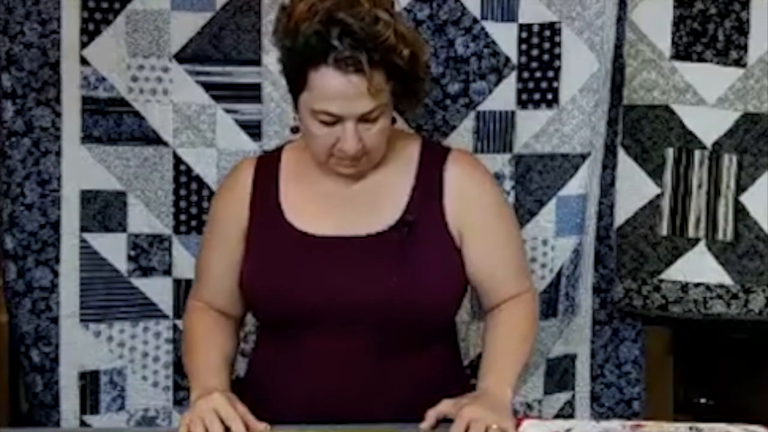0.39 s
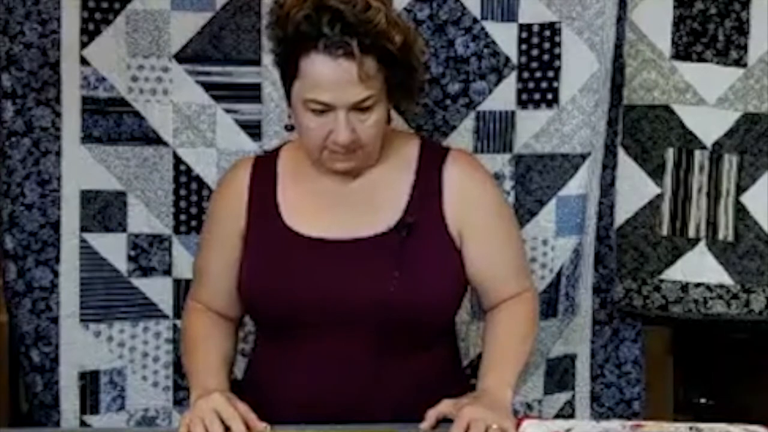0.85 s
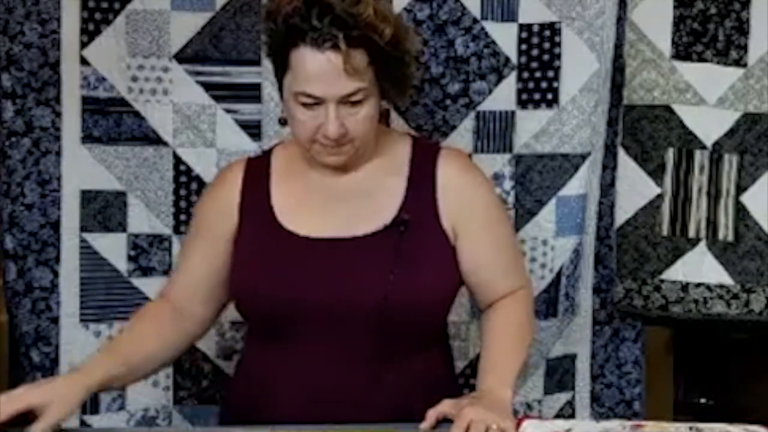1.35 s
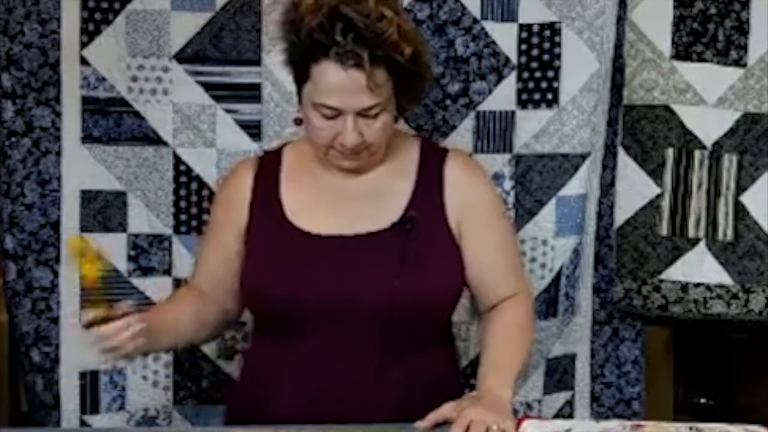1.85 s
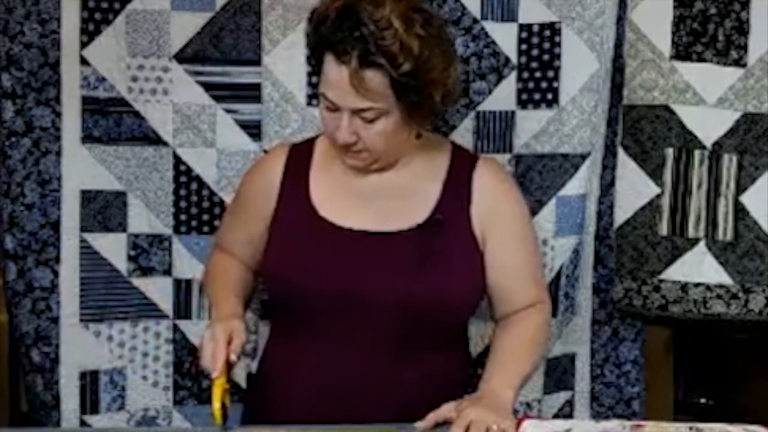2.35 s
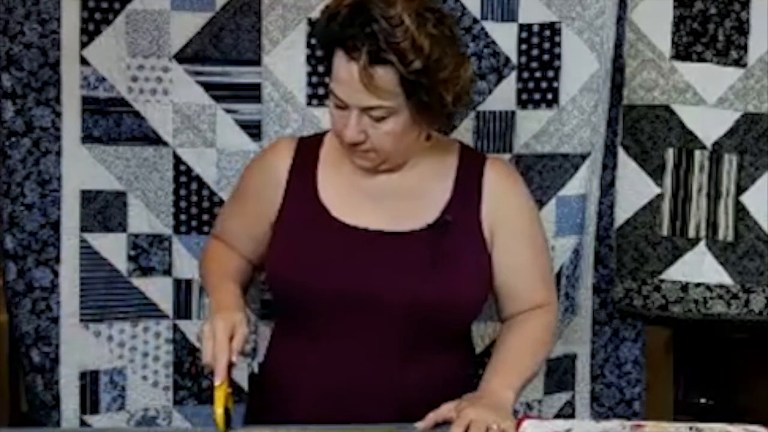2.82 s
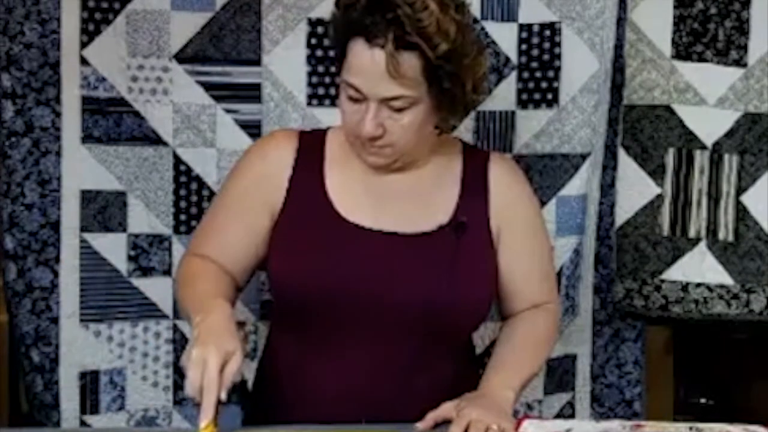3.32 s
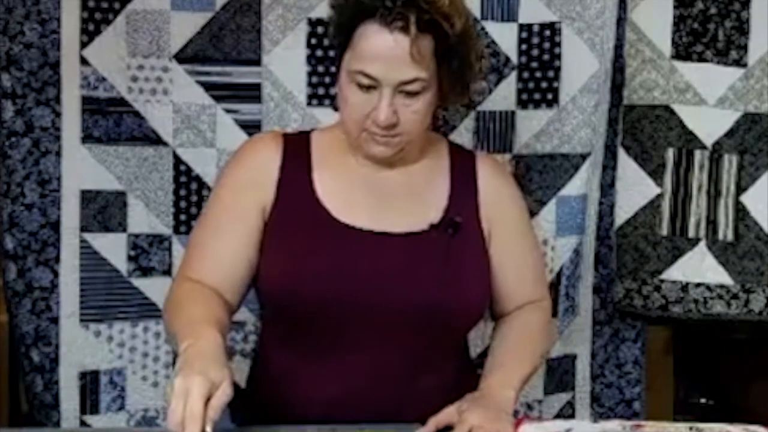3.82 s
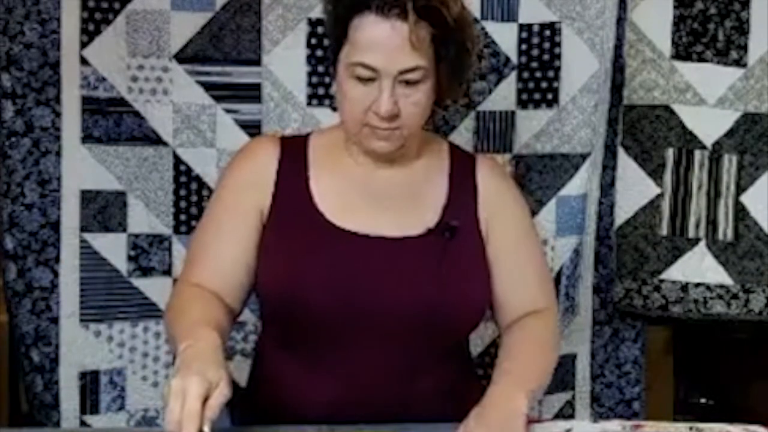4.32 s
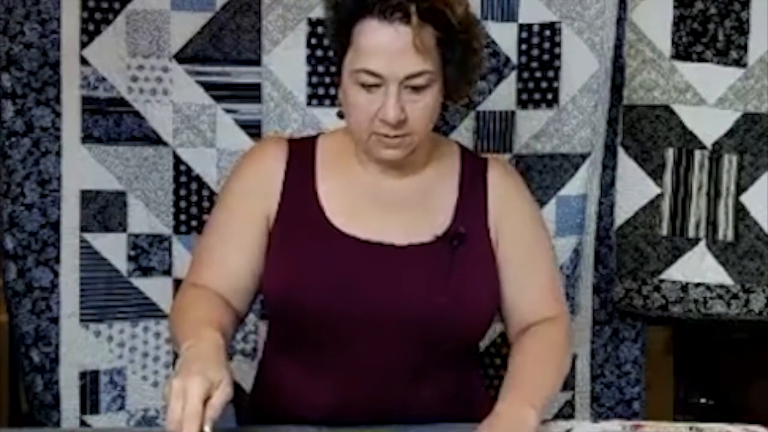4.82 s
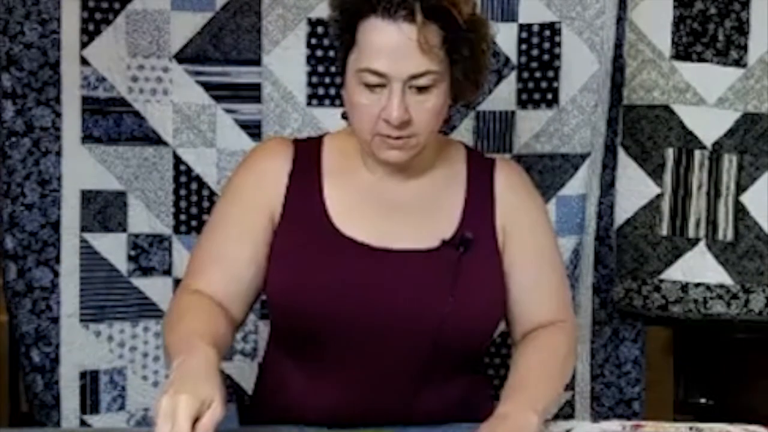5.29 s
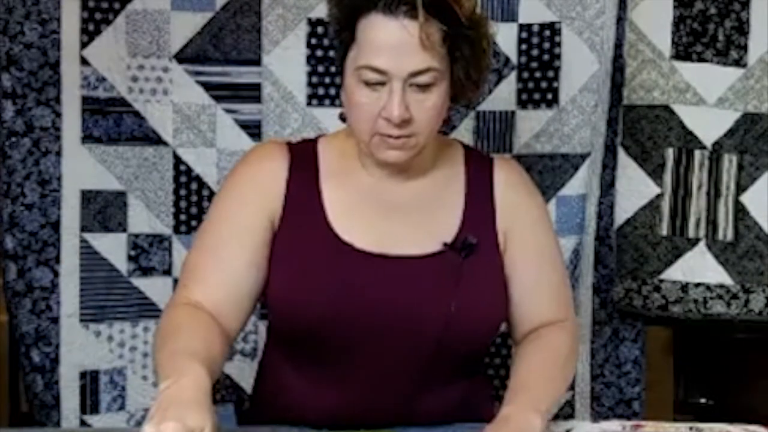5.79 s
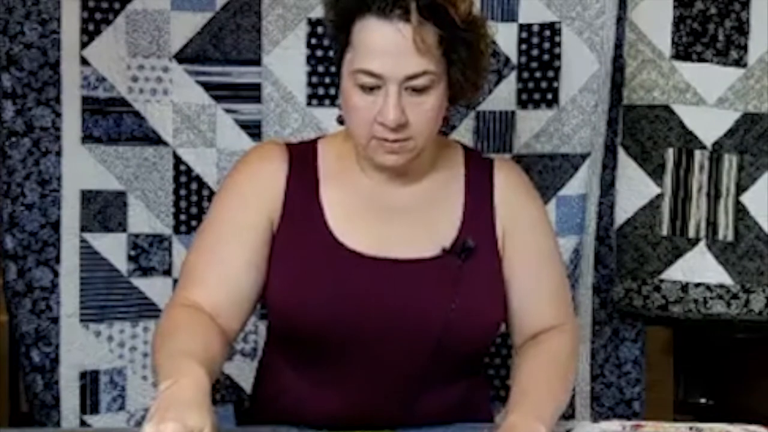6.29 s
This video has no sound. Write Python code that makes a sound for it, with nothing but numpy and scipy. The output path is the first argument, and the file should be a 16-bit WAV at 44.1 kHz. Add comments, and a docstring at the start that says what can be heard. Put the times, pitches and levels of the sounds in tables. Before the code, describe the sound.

A small, quiet room with a soft steady hiss and a faint low table rumble, heard close in mono. The first second is nearly still, with only a tiny rustle and light thumps. At 1.3 s a sharp plastic clack snaps out, followed by small rattles, a louder crack near 1.6 and another at 1.8, with thumps and brushing cloth. Faint ticks and rustles lead to about 2.8. From 2.9 to 3.6 a rotary cutter rolls through cotton: a swelling bright, grainy crackle with a scratchy scrape, slight metallic ring and clicks near 3.4 and 3.5. A lighter, thinner slide back runs to about 4.4, with ticks near 3.75. Soft rustling follows. A second, duller cut rasps from 4.9 to 5.6, with taps at 5.2 and 5.4. A brief gentle slide near 6.0 fades into hiss.

```python
"""A rotary cutter rolls through cotton on a cutting mat: threads snap in a bright crackle of tiny grains,
the blade scrapes the mat, and the same grainy drag rings the blade and ruler. Cloth brushes by in coloured grains.
Before the cut come sharp plastic taps, short bursts of noise that ring the handle; more blows fall among the passes.
The table rumbles on its low modes, and a small room of sparse echoes lies under a quiet hiss."""
import sys
import numpy as np
from scipy import signal
from scipy.io import wavfile
from scipy.ndimage import uniform_filter1d

SR = 44100
rng = np.random.default_rng(int(sys.argv[2]) if len(sys.argv) > 2 else 0)


def wrap_up_sound(samples):
    """Save the sound to the file named by the first command line argument, as 16-bit audio."""
    columns = np.atleast_2d(samples).T
    # keep every value between -1 and 1, then stretch to whole-number steps
    tamed = np.clip(columns, -1, 1)
    steps = np.round(tamed * 32767).astype(np.int16)
    wavfile.write(sys.argv[1], SR, steps)


def boost(x):
    """Linear amplitude factor 10**(x/20) for a level x in decibels (scalar or array-like)."""
    u = np.asarray(x, float) / 20
    return 10 ** u


N = 282899

# Colour of the background hiss. Each row: frequency in Hz, relative level in dB per Hz.
HISS_COLOUR = [(15, -30), (25, -6.5), (71, -3), (152, -7.5), (322, -18.5), (399, -10), (456, -15.5),
               (581, -13.5), (741, -15.5), (1170, -13.5), (1950, -17.5), (6540, -22), (9790, -23),
               (13500, -14.5), (15500, -44)]
HISS_DB = -53.5

# Low modes of the table. Each row: frequency in Hz, width in Hz, relative level in dB.
TABLE_MODES = [(62.7, 11.6, 3.5), (76.5, 8.7, -5.5)]
# Modes of the cutting mat. Each row: frequency in Hz, width in Hz, relative level in dB.
MAT_MODES = [(173, 330, -0.5), (308, 74, 0.5), (377, 79, -2), (514, 134, 1)]
# Weight landing on the table. Each row: start in seconds, table push in dB, mat push in dB, length in seconds.
THUMPS = [(0.39, -51, -67, 0.06), (0.797, -55, -59, 0.054), (1.287, -38.5, -44, 0.066),
          (1.38, -52, -46.5, 0.045), (1.419, -55, -52.5, 0.14), (1.506, -39.5, -51.5, .1),
          (1.717, -61, -57, .06), (2.39, -50, -50, 0.069), (2.77, -46, -54.5, 0.066),
          (2.827, -43, -56, 0.13), (3.026, -52, -53, 0.27), (3.21, -44, -51.5, 0.17),
          (3.356, -46.5, -61, 0.15), (3.456, -48, -57, 0.17), (4.42, -65, -74, 0.047),
          (4.882, -52.5, -61, 0.15), (5.227, -52, -68, 0.11), (5.34, -47, -59, 0.17),
          (5.675, -47, -55, 0.047), (5.935, -52, -68, 0.087)]
THUMP_RISE_S = 0.015
IDLE_TABLE_DB, IDLE_MAT_DB, IDLE_WAVER_DB = -59, -63.5, 1

# Four passes of the cutter: cut, slide back, cut, short slide. Each row of a pass: time in seconds,
# thread crackle in dB, scrape in dB, low mids in dB; the last two before the shares below.
PASSES = [
    [(2.86, -60, -66, -64), (2.916, -45, -54.5, -50), (2.996, -37, -45, -62), (3.1, -31.5, -42, -51.5),
     (3.202, -29.5, -40.5, -44.5), (3.3, -27, -40, -43.5), (3.4, -28, -41, -38.5),
     (3.47, -35.5, -39, -46.5), (3.51, -33.5, -42.5, -42.5), (3.552, -54, -67, -58), (3.6, -41, -60, -60)],
    [(3.6, -44, -57.5, -57), (3.678, -41.5, -54.5, -63), (3.726, -35.5, -50.5, -56.5),
     (3.88, -31.5, -50, -57), (3.928, -29.5, -44.5, -41), (3.97, -33, -51, -57.5), (4.158, -33.5, -52, -65),
     (4.274, -41.5, -61.5, -67), (4.46, -55, -68, -78)],
    [(4.87, -65, -75, -65), (4.944, -50.5, -55.5, -57), (5.01, -42.5, -48.5, -49), (5.15, -40.5, -46, -46),
     (5.21, -39.5, -42.5, -48.5), (5.37, -35.5, -41.5, -40.5), (5.488, -34.5, -39.5, -43.5),
     (5.568, -50, -53.5, -47.5), (5.63, -54, -72, -72)],
    [(5.84, -53, -73, -65), (5.912, -43.5, -55.5, -56.5), (5.978, -40, -48, -51.5),
     (6.014, -42.5, -48.5, -56), (6.06, -48, -63, -62), (6.14, -72, -79, -79)],
]
# How each pass shares out. Each row: mat scrape and blade ring in dB on the scrape,
# then ruler ring, cloth brush and mat thud in dB on the low mids.
PASS_SHARES = [(0.5, -10, -3, -1, -11.5), (-2.5, -14, -9.5, -3, -13), (-4.5, -8, -1.5, -4, -13),
               (-4, -5, -33, 1.5, -17)]
# Hands and cutter brushing over the cloth. Each row: peak time in seconds, crackle in dB, scrape in dB,
# low mids in dB, length in seconds; scrape and low mids before the shares.
RUSTLES = [(0.018, -40, -62, -72, 0.036), (1.1, -48, -71, -68, 0.16), (1.333, -60, -54, -53, 0.14),
           (1.405, -62, -57, -49, .1), (1.499, -42, -49, -40.5, 0.12), (1.568, -40.5, -50, -46.5, 0.072),
           (1.632, -46, -51, -55, .2), (1.847, -47, -50, -61, .15), (2.025, -48, -59, -73, 0.19),
           (2.237, -58, -66, -67, 0.17), (2.74, -55, -63, -62, 0.52), (4.515, -48, -68, -68, 0.21),
           (4.68, -51, -66, -72, .2), (5.692, -46.5, -58.5, -59, 0.38), (6.23, -59, -72, -74, 0.17)]
# How every rustle shares out: the same five values in dB as a row of the pass shares.
RUSTLE_SHARES = (-0.5, -12.5, -14, 1, -14)
RUSTLE_EDGE_DB, RUSTLE_RISE = -12.5, 0.32  # either end against the peak; share of the length spent rising

# Colour of the parting threads. Each row: frequency in Hz, relative level in dB per Hz.
THREAD_COLOUR = [(880, -38), (1500, -18), (1770, -27.5), (3470, -18.5), (3870, -19), (7960, -17),
                 (11200, -5), (13200, 1.5), (14400, 0), (14900, -24), (15500, -32)]
# Colour of the blade scraping the mat. Each row: frequency in Hz, relative level in dB per Hz.
SCRAPE_COLOUR = [(320, -39), (550, 3.5), (801, -4), (1560, -3), (1940, -9.5), (3310, 2), (3930, -1.5),
                 (6230, 0), (10000, -1), (13000, -53), (22000, -120)]
# Colour of the brushing cloth. Each row: frequency in Hz, relative level in dB per Hz.
BRUSH_COLOUR = [(300, -36), (700, -4.5), (1300, 2), (1900, -4), (2400, -7.5), (3500, -9), (6000, -23)]
# Modes of the singing blade. Each row: frequency in Hz, width in Hz, level in dB before the song's centre tilts it.
BLADE_MODES = [(2530, 250, -2), (2800, 82, -6), (3100, 18, -8.5), (3400, 250, 2), (4040, 280, 0),
               (4380, 31, -0.5), (4730, 99, 1.5), (5150, 90, -14)]
# Where the blade sings most. Each row: time in seconds, centre frequency in Hz.
SONG_CENTRE = [(2.9, 4550), (3.14, 4540), (3.2, 3400), (4.95, 3300), (5.1, 3180), (5.2, 2890), (5.28, 4170),
               (5.42, 3570), (5.6, 3400), (5.9, 2600)]
# Modes of the ruler. Each row: frequency in Hz, width in Hz, relative level in dB.
RULER_MODES = [(881, 26.5, 5.5), (1150, 160, 2.5), (1621, 87, 4)]

# How long the room rings. Each row: frequency in Hz, time to fall 60 dB in seconds.
ROOM_T60 = [(200, 0.041), (1500, 0.37), (4000, 0.25), (9000, 0.2), (14000, 0.24)]

# Blows on the plastic. Each row: start in seconds, snap in dB, crack in dB, handle ring in dB,
# frequency in Hz near which the struck spot rings the handle most.
TAPS = [(1.296, -14, -20.5, -26.5, 2600), (1.3174, -48, -43, -36, 2000), (1.376, -53, -36, -26.5, 1410),
        (1.3885, -50, -37, -39, 2600), (1.41, -55, -50, -44, 1600), (1.472, -38, -40.5, -42, 1473),
        (1.4897, -30, -29, -24.5, 2570), (1.5016, -38, -35, -38, 1400), (1.517, -41, -41, -32, 1500),
        (1.531, -41, -38, -36, 2500), (1.566, -46, -38, -46, 4200), (1.5757, -10.5, -14, -25, 2010),
        (1.5951, -40, -40, -37, 1810), (1.621, -31, -38, -39, 1700), (1.796, -53, -43, -40, 3000),
        (1.8014, -17, -21, -24.5, 4030), (1.807, -40, -40, -31, 1650), (1.8296, -32, -37, -44, 1650),
        (2.005, -42, -49.5, -49, 2800), (2.0743, -45, -44.5, -55, 4000), (2.3454, -44, -47.5, -62, 4000),
        (2.655, -45, -47, -57, 3000), (2.8255, -42, -46, -53, 3000), (3.3852, -20, -36, -35, 5000),
        (3.484, -21, -32, -50, 1600), (3.743, -30, -46, -47, 3000), (3.7677, -25, -44, -53, 4000),
        (3.916, -36, -42, -47, 1300), (5.177, -29, -35, -31, 1400), (5.3674, -22.5, -31, -35, 1100),
        (5.3715, -25, -31.5, -39, 4000)]
# Colour of the snap. Each row: frequency in Hz, relative level in dB per Hz.
SNAP_COLOUR = [(3530, -32.5), (6000, -16.5), (10800, -1.5), (12400, -3), (13800, 4.5), (14800, -8),
               (15500, -41)]
# Colour of the crack. Each row: frequency in Hz, relative level in dB per Hz.
CRACK_COLOUR = [(530, -54), (900, -5), (1460, 3), (2160, -1.5), (3090, -3), (4330, 1), (5450, -4.5),
                (6490, -5.5), (7010, -6), (9000, -20), (11700, -8.5), (19800, -120)]
# Modes of the handle. Each row: frequency in Hz, width in Hz, level in dB before the struck spot tilts it.
HANDLE_MODES = [(1050, 310, -6), (1400, 66, -3.5), (1612, 56, 3), (1980, 170, -3.5), (2400, 240, -4),
                (2750, 260, 5), (3000, 180, 3), (4250, 360, -1.5), (5100, 160, 3.5)]
CLATTER_T60_S = 0.029
SPOT_DB, KNOCK_DB = -13.5, -38  # change per squared octave from the struck spot; mat knock against the crack


def evened(x):
    """Scales to rms 1."""
    return x / np.sqrt(np.mean(x ** 2) + 1e-20)


def smoothed_twice(x, size):
    """Two running means along the last axis, for slow random drifts."""
    return uniform_filter1d(uniform_filter1d(x, size=size), size=size)


def read(points, hz):
    """Reads a table on a log-frequency axis."""
    f, value = np.transpose(points)
    return np.interp(np.log(hz + 1), np.log(f + 1), value)


def coloured(x, points):
    """Causal minimum-phase filter with the given spectrum; white noise keeps its rms."""
    hz = abs(np.fft.fftfreq(8192, 1 / SR))
    log_gain = np.log(boost(np.maximum(read(points, hz), -100)))
    spectrum = np.exp(np.conj(signal.hilbert(log_gain)))
    impulse = np.fft.ifft(spectrum).real[:4096]
    return signal.oaconvolve(x, impulse / np.linalg.norm(impulse))[:len(x)]


def rung(x, modes):
    """Excites a set of decaying resonances; white noise of rms 1 comes out at rms 1."""
    t = np.arange(8192) / SR
    impulse = np.zeros(len(t))
    for hz, width, db in modes:
        decay = np.exp(-np.pi * width * t)
        impulse += boost(db) * np.sqrt(width) * decay * np.sin(2 * np.pi * hz * t)
    return signal.oaconvolve(x, impulse / np.linalg.norm(impulse))[:len(x)]


def grains(per_s, spread_db, clump_db, judder_db, smooth):
    """Tiny clicks of uneven size that come in clumps and slower judders, over a share of smooth noise."""
    size = boost(spread_db * np.minimum(rng.exponential(1, N), 5)) * rng.choice([-1., 1.], N)
    clicks = evened(size * (rng.random(N) < per_s / SR))
    clumps = clump_db * evened(uniform_filter1d(rng.standard_normal(N), size=130))
    judder = judder_db * evened(smoothed_twice(rng.standard_normal(N), 700))
    return evened(boost(clumps + judder) * (clicks + smooth * rng.standard_normal(N)))


def hiss():
    """Steady random noise with a fixed colour."""
    return boost(HISS_DB) * coloured(rng.standard_normal(N), HISS_COLOUR)


def table(thud):
    """A faint wavering rumble and short pushes shake the low modes of the table and thud on the mat."""
    t, push = np.arange(N) / SR, rng.standard_normal((2, N))
    waver = evened(smoothed_twice(rng.standard_normal((2, N)), 2500))
    idle_db = np.array([[IDLE_TABLE_DB], [IDLE_MAT_DB]])
    power = boost(idle_db + IDLE_WAVER_DB * waver) ** 2
    power[1] += thud ** 2
    for s, table_db, mat_db, length in THUMPS:
        rise = np.clip((t - s) / THUMP_RISE_S, 0, 1)
        fall = np.clip(2 * (s + length - t) / length, 0, 1)  # over the second half
        power += (boost([[table_db], [mat_db]]) * rise * fall) ** 2
    table_push, mat_push = np.sqrt(power) * push
    return rung(table_push, TABLE_MODES) + rung(mat_push, MAT_MODES)


def efforts():
    """Gains for threads, scrape, blade, ruler, brush and mat thud; passes and rustles add in power."""
    t, power = np.arange(N) / SR, np.zeros((6, N))
    moves = list(zip(PASSES, PASS_SHARES))
    for s, *peak_db, length in RUSTLES:
        peak_db = np.array(peak_db)
        edge_db = peak_db + RUSTLE_EDGE_DB
        start, end = s - RUSTLE_RISE * length, s + (1 - RUSTLE_RISE) * length
        moves.append(([(start, *edge_db), (s, *peak_db), (end, *edge_db)], RUSTLE_SHARES))
    for rows, shares_db in moves:
        s, *columns = np.transpose(rows)
        on = (t >= s[0]) & (t < s[-1])
        crackle, scrape, low = (np.interp(t[on], s, db) for db in columns)
        levels_db = np.array([crackle, scrape, scrape, low, low, low])
        power[:, on] += boost(levels_db + np.r_[0, shares_db][:, None]) ** 2
    return np.sqrt(power)


def patchy(x, depth_db):
    """Bands swell and fade in short random patches as the contact shifts."""
    z = signal.stft(x, nperseg=512)[2]
    field = uniform_filter1d(rng.standard_normal(z.T.shape), size=9, axis=0)  # along time
    field = uniform_filter1d(field, size=4, axis=1).T  # across frequency
    patches = boost(depth_db * evened(field))
    return signal.istft(z * patches / np.sqrt(np.mean(patches ** 2)), nperseg=512)[1][:N]


def strokes(effort):
    """Threads part in a crackle; the rolling blade scrapes the mat, sings and rings the ruler; cloth brushes by."""
    parting, scraping, singing, ringing, brushing = effort
    threads = coloured(parting * grains(4000, 1.3, 0.89, 1.0, 1.0), THREAD_COLOUR)
    drag = grains(4000, 1.4, 0.44, 1.27, 1.7)
    scrape = coloured(scraping * drag, SCRAPE_COLOUR)
    brush = coloured(brushing * grains(4000, 3.0, 0.73, 0.87, 0.9), BRUSH_COLOUR)
    centre_hz = np.interp(np.arange(N) / SR, *np.transpose(SONG_CENTRE))
    song = np.zeros(N)
    for hz, width, db in BLADE_MODES:
        mode_gain = boost(db - 42.0 * np.log2(hz / centre_hz) ** 2)  # modes far from the centre stay quiet
        song += rung(mode_gain * singing * drag, [(hz, width, 0)])
    ruler = rung(ringing * drag, RULER_MODES)
    return patchy(threads + scrape + brush, depth_db=2.5) + song + ruler


def room(x):
    """Sparse echoes of random sign, each band dying at its own speed."""
    echoes = np.zeros(SR // 2)
    at = np.arange(300, SR // 2 - 20, 20)  # one echo in every 20 samples
    echoes[at + rng.integers(0, 20, len(at))] = rng.choice([-1., 1.], len(at))
    hz, t, z = signal.stft(echoes, SR, nperseg=256)
    decay = boost(-60 * t / read(ROOM_T60, hz)[:, None])
    tail = signal.istft(z * decay, SR, nperseg=256)[1]
    return signal.oaconvolve(x, tail / np.linalg.norm(tail))[:N]


def taps():
    """Each tap is a few milliseconds of spiky clatter that snaps, cracks, rings the handle and knocks the mat."""
    t = np.arange(3000) / SR
    chatter = rng.standard_normal((len(TAPS), 2, len(t)))
    snap, crack, ring = blows = np.zeros((3, N + len(t)))
    shape = boost(-60 * t / CLATTER_T60_S) * (1 - np.exp(-t / .0004))
    for (s, snap_db, crack_db, ring_db, spot_hz), (noise, spikes) in zip(TAPS, chatter):
        burst = shape * noise * boost(3.0 * evened(uniform_filter1d(spikes, size=24)))
        burst *= np.linalg.norm(shape) / np.linalg.norm(burst)  # spikes move the energy about but add none
        modes = [(hz, width, db + SPOT_DB * np.log2(hz / spot_hz) ** 2) for hz, width, db in HANDLE_MODES]
        parts = [burst, burst, rung(burst, modes)]
        start = round(s * SR)
        blows[:, start:start + len(t)] += boost([[snap_db], [crack_db], [ring_db]]) * parts
    bright = (coloured(snap, SNAP_COLOUR) + coloured(crack, CRACK_COLOUR) + ring)[:N]
    knock = boost(KNOCK_DB) * rung(crack[:N], MAT_MODES)
    return bright + boost(-9.5) * room(bright) + knock


def scene():
    """One microphone feeds both channels."""
    *effort, thud = efforts()
    work = strokes(effort)
    mono = hiss() + table(thud) + work + boost(-11.0) * room(work) + taps()
    return np.array([mono, mono])


def roll_off(x):
    """The treble ends steeply here."""
    return signal.sosfilt(signal.butter(12, 15620, fs=SR, output="sos"), x)


def record(dry):
    """The microphone drops the deepest bass, below about 41 Hz."""
    low_cut = signal.butter(6, 41, "highpass", fs=SR, output="sos")
    mix = signal.sosfilt(low_cut, dry)
    return roll_off(mix)


dry = scene()
out = record(dry)
wrap_up_sound(out)
```